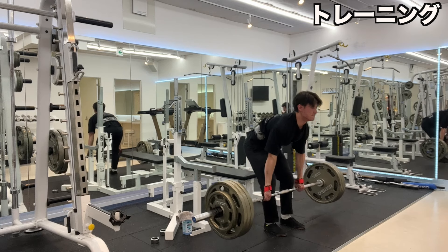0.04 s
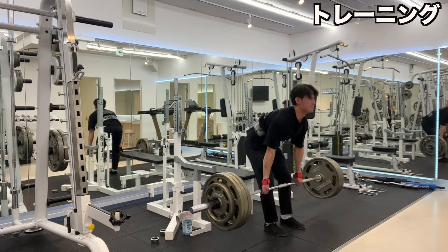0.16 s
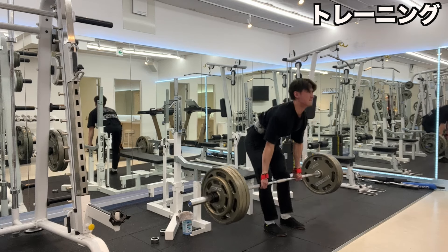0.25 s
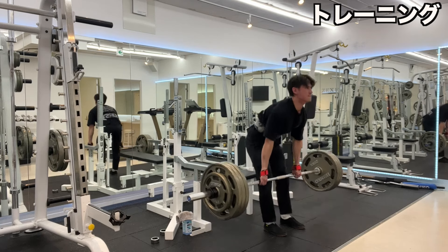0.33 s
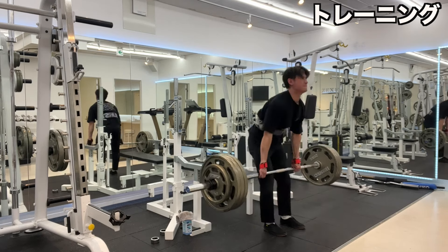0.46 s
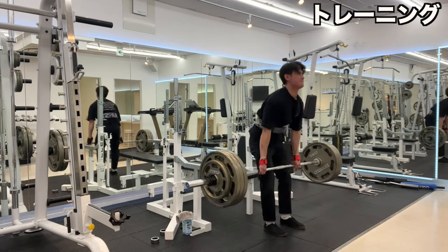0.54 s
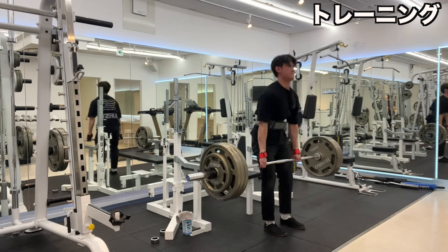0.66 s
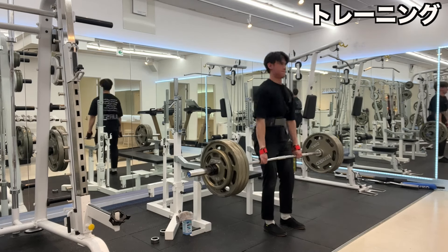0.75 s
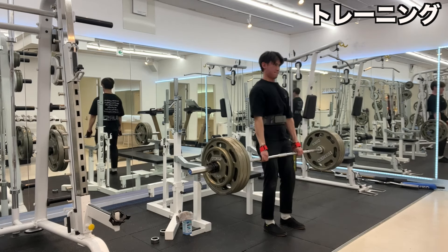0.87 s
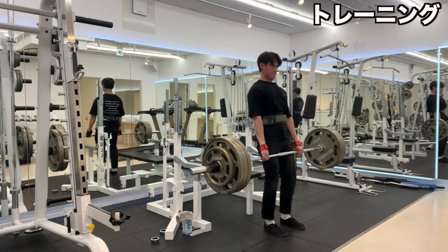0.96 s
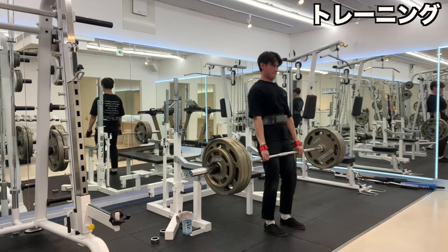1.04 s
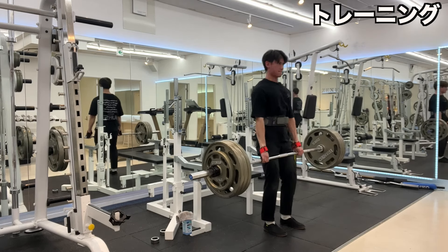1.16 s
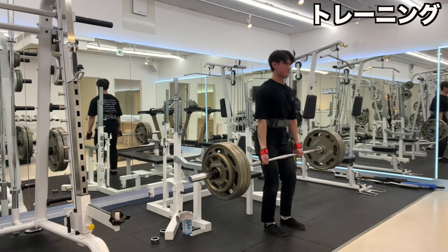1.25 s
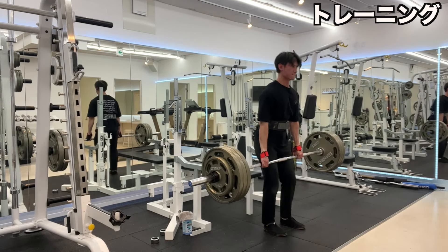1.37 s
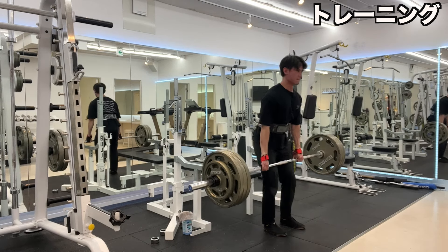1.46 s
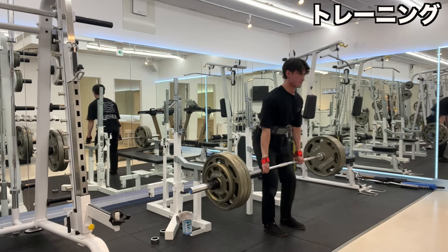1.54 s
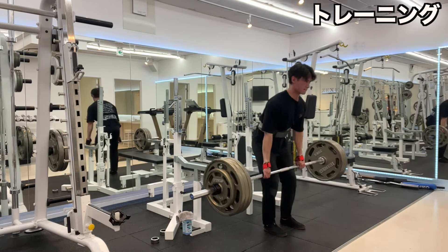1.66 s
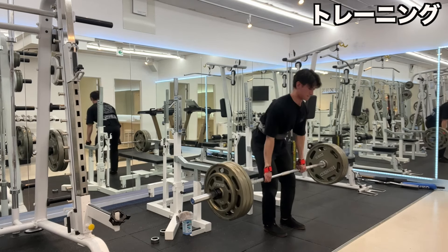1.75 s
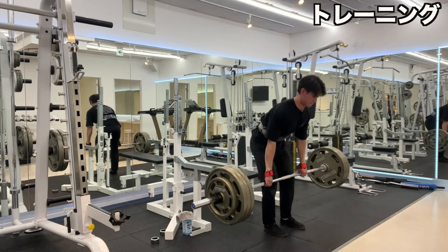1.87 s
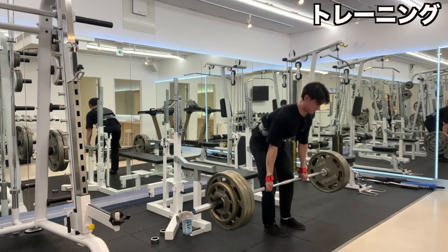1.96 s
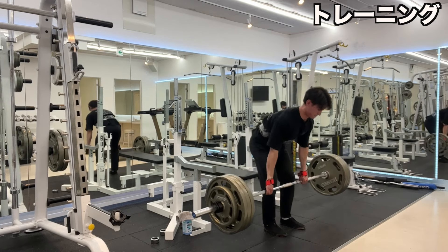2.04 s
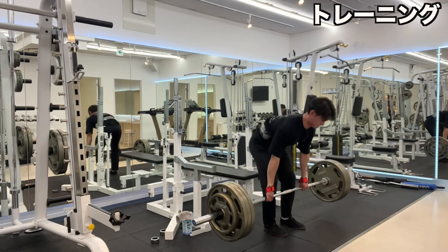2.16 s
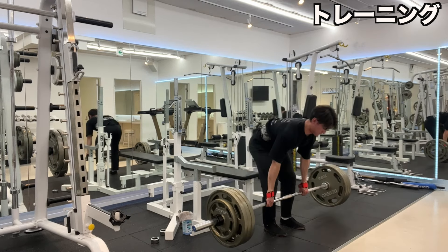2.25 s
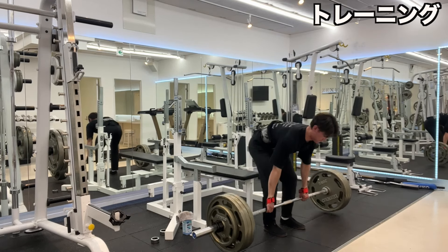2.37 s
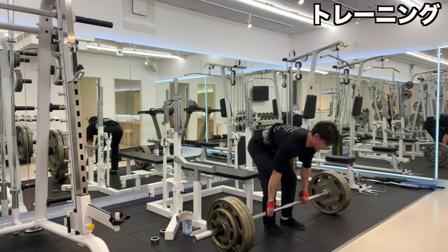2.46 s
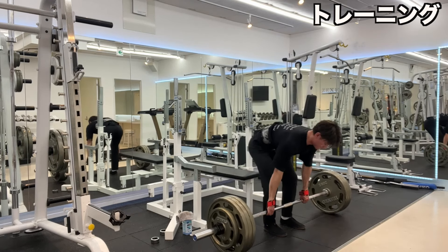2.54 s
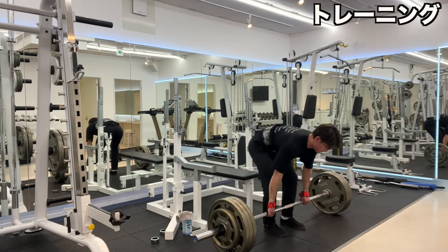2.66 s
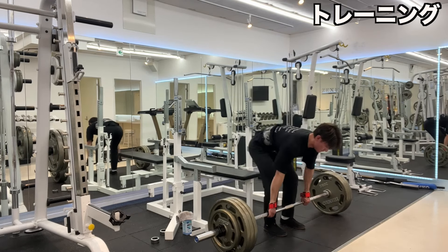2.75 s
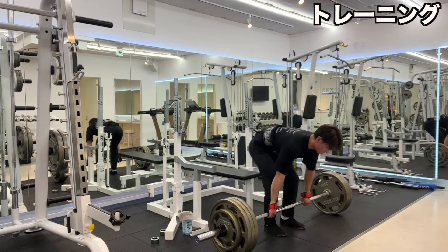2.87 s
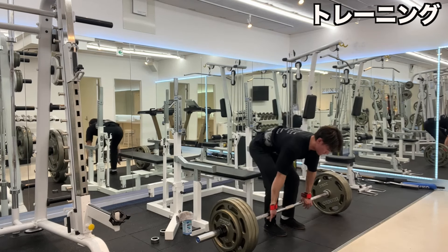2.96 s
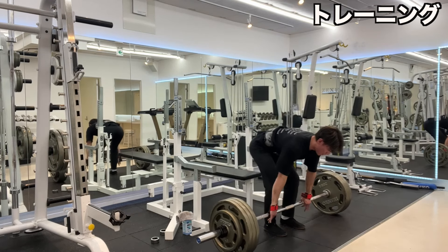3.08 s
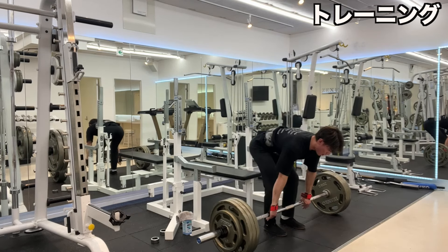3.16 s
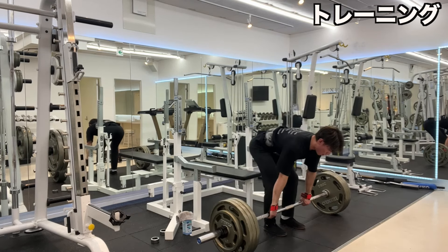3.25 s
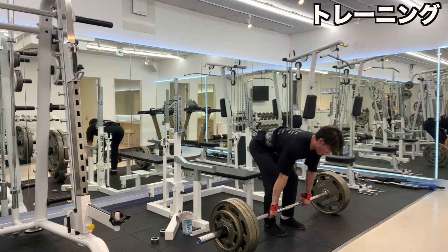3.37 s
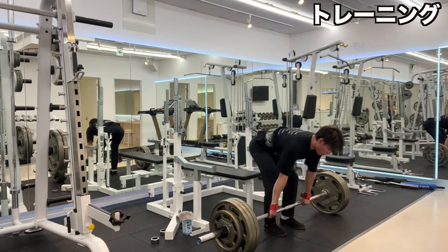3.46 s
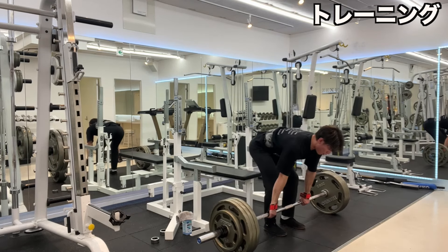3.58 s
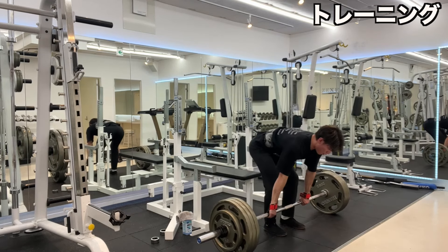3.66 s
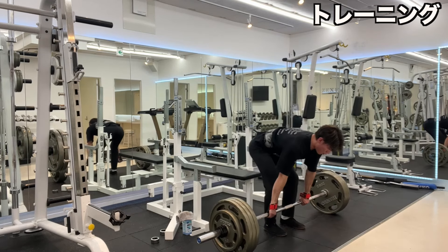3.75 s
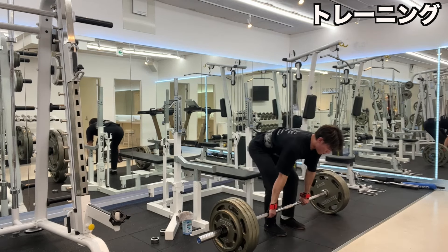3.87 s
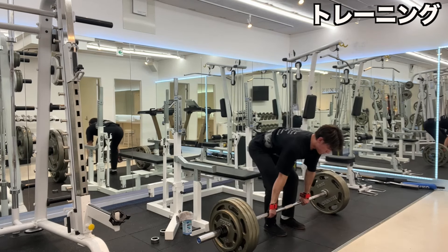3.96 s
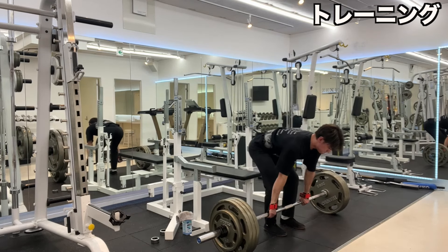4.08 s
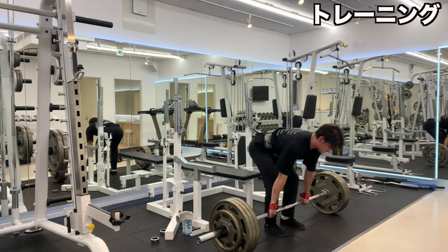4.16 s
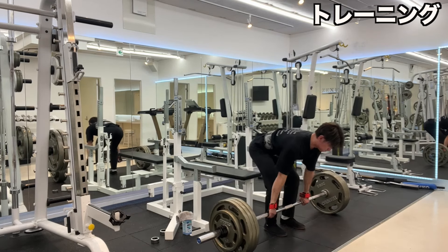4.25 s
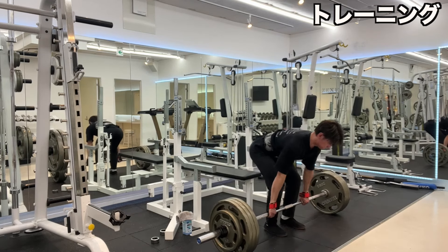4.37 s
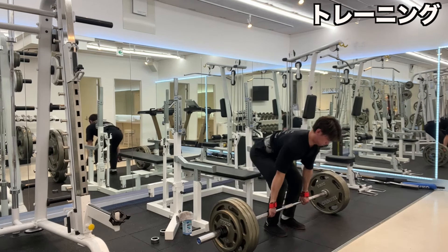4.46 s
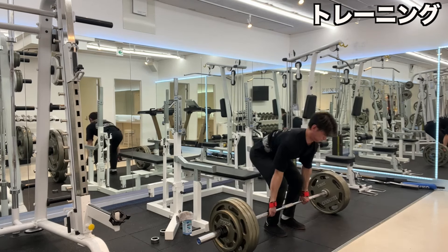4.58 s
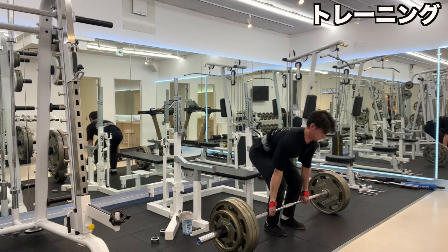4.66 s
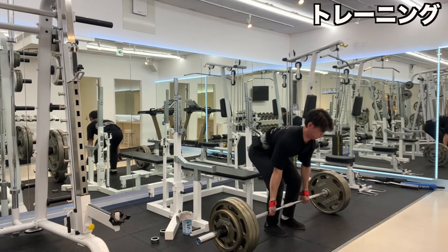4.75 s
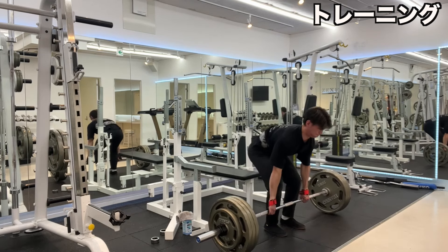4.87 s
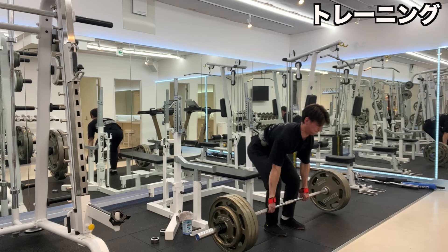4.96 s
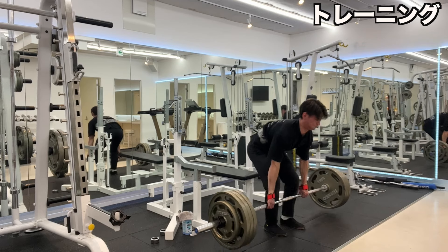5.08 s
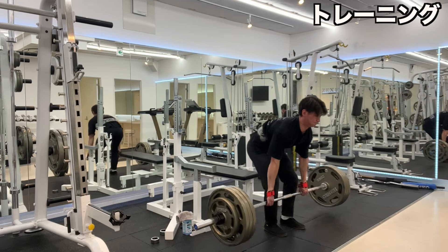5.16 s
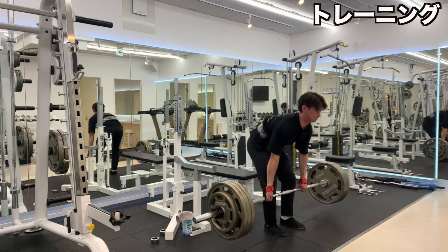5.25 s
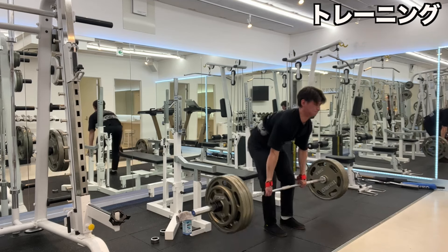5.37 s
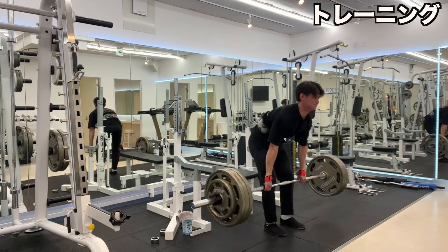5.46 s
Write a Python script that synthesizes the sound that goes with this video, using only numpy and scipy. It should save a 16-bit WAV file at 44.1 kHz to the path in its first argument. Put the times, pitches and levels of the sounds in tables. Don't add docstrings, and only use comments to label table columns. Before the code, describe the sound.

Loose iron plates clank and ring on a barbell during a lift, then go almost quiet. The bar slams onto a rubber floor with a loud metallic crash, rattle and deep thud, bounces and rocks to rest. After a pause it clanks upward again, with shoe scuffs. Low ventilation hum; close stereo microphone in a moderately reverberant gym.

```python
import sys
import numpy as np
from scipy import signal
from scipy.fft import rfft, irfft, next_fast_len
from scipy.io import wavfile
from scipy.ndimage import map_coordinates

SR = 44100
rng = np.random.default_rng(int(sys.argv[2]) if len(sys.argv) > 2 else 0)


def gain_from_db(level_db):
    decades = np.asarray(level_db, float) / 20
    return 10 ** decades


def inscribe(sig):
    pcm = np.round(np.clip(np.atleast_2d(sig).T, -1, 1) * 32767)
    wavfile.write(sys.argv[1], SR, pcm.astype(np.int16))


N = 243431


def unit(x):
    return x / np.sqrt(np.mean(x ** 2) + 1e-20)


def along(points, hz):
    f, v = np.transpose(points)
    return np.interp(np.log(hz + 1), np.log(f + 1), v)


def wobble(rate_hz):
    knots = rng.standard_normal(int(N * rate_hz / SR) + 4)
    return map_coordinates(knots, [np.arange(N) * rate_hz / SR])


def filtered(x, response):
    m = next_fast_len(N + SR // 2)
    return irfft(rfft(x, m) * response(np.fft.rfftfreq(m, 1 / SR)), m)[..., :N]


def noise(spectrum):
    return unit(filtered(rng.standard_normal(N), lambda hz: gain_from_db(along(spectrum, hz))))


def resonance(hz, centre_hz, width_hz):
    loss = 1j * hz * width_hz
    return loss / (centre_hz ** 2 - hz ** 2 + loss)


# pitch_hz, level_db
AIR = [(12, -34), (20, -6.5), (120, -10.5), (195, -13), (336, -10.5), (441, -19.5), (779, -19.5),
       (1300, -27.5), (1860, -34), (2570, -40), (13100, -58.5)]
# pitch_hz, correlation
AIR_ALIKE = [(60, 0.76), (170, 0.52), (1490, -0.53), (9000, 0.31), (13000, -0.3)]
# pitch_hz, level_db, width_hz
MOTOR = [(106, -59, 4), (202, -69, 3.7)]


def ventilation():
    def turn(hz):
        return np.arccos(np.clip(along(AIR_ALIKE, hz), -1, 1)) / 2

    pair = np.array([noise(AIR), noise(AIR)])
    mid, side = filtered(pair, lambda hz: [np.cos(turn(hz)), np.sin(turn(hz))])
    duct = gain_from_db(-61.5 + 5.0 + 0.7 * wobble(3.0)) * np.array([mid + side, mid - side])
    hum = np.zeros(N)
    for hz, db, width_hz in MOTOR:
        level = np.sqrt(2) * gain_from_db(db + 0.51 * wobble(8.2))
        hum += level * np.sin(2 * np.pi * np.cumsum(hz + width_hz * wobble(17)) / SR)
    return duct + hum * gain_from_db([[0.8], [-0.8]])


FAMILY_EDGES = [825, 1450, 2250, 3300]
# pitch_hz, t60_s
RING = [(500, 0.3), (1000, 0.14), (1700, 0.23), (2800, 0.28), (4200, 0.51)]
# pitch_hz, level_db
KNOCK = [(110, -47.5), (210, -21.5), (511, -9.5), (624, -5.5), (862, -9.5), (1010, -2), (1520, -18.5),
         (1960, -14.5), (2170, -23.5), (2930, -28.5), (3200, -48), (11000, -120)]


def plates(contacts, modes, scatter_db, knock_db, high_db, top_db, rub, choke_s, main_db):
    hz, level_db = np.transpose(modes)
    family = np.searchsorted(FAMILY_EDGES, hz)
    knots, t = np.arange(36) / 100, np.arange(SR * 35 // 100) / SR
    between = np.maximum(1 - 100 * np.abs(t - knots[:, None]), 0)
    rise = (1 - np.exp(-t / 0.0017)) ** 2 * (0.66 + 0.4 * np.exp(-t / 0.011))
    chance = rng.standard_normal((len(contacts), len(hz), 2 + 2 * len(knots)))
    follow = np.append(np.transpose(contacts)[0][1:], 99)
    strongest_db = np.max(contacts, axis=0)[1]
    out, knocks = np.zeros(N + SR), np.zeros((3, N + SR))
    for (s, db, flat_db, edge_db), later, draw in zip(contacts, follow, chance):
        hard = 0.58 * (db - strongest_db)
        high = high_db + edge_db + hard
        top = top_db + 0.78 * edge_db + hard
        damp = gain_from_db(-60 * np.maximum(t - (later - s), 0) / choke_s) * np.cos(np.pi / 2 * (t / t[-1]) ** 2)
        drift = np.cumsum(rub * draw[:, 2::2], axis=1) @ between
        swell = gain_from_db(2.28 * rub * draw[:, 3::2] - 60 * knots / along(RING, hz)[:, None])
        swell[family > 2] *= 1 - np.exp(-knots / (0.002 * np.abs(hard) + 1 / SR))
        swell = swell @ between
        turn = 2 * np.pi * (hz * (1 + 0.0058 * draw[:, 1]))[:, None] * t + drift
        share = gain_from_db(level_db + scatter_db * draw[:, 0])
        share /= np.sqrt(np.bincount(family, share ** 2))[family]
        family_db = np.array([flat_db, main_db, edge_db + main_db, high, top])
        gain = share * gain_from_db(db + 2.5 + family_db[family])
        start = max(round((s - 0.002) * SR), 0)
        out[start:][:len(t)] += rise * damp * (gain @ (swell * np.sin(np.float32(turn))))
        band_db = np.array([[flat_db + 8], [0], [edge_db + 3]])
        knocks[:, start:][:, :len(t)] += gain_from_db(db + knock_db + band_db - 60 * t / 0.16) * rise * damp
    body = filtered(noise(KNOCK), lambda f: np.searchsorted(FAMILY_EDGES[:2], f) == [[0], [1], [2]])
    return out[:N] + np.sum(knocks[:, :N] * body, axis=0)


# (rim blows, 1.7 kHz family and up)
CARRIED = [(0.003, -32.5, -8.5, 2.5), (0.08, -27.5, -11, -4), (0.139, -34.5, -4, 3.5), (0.179, -52, 3, 8.5),
           (0.279, -42, -2.5, -14), (0.344, -45.5, -14, -6.5), (0.558, -35, -13, -15),
           (0.612, -36, -11, -1), (0.644, -25, -11, -1.5), (0.69, -33, -4, 12), (0.703, -44, -17.5, -9),
           (0.759, -32, -25, -13.5), (0.889, -41.5, -10.5, -13), (0.968, -51.5, -3, 0.5),
           (1.283, -42.5, -6, -4.5), (1.404, -47, -1.5, -11), (1.55, -68, -14, -11), (1.871, -40, -8, -2.5),
           (1.921, -43, -9, -3), (1.967, -31.5, -12, 0.5), (1.997, -39.5, -10, 9), (2.039, -43.5, -12, 9.5),
           (2.14, -46.5, -12, -14), (5.163, -32, -9.5, -3.5), (5.252, -34, -12.5, 2.5),
           (5.27, -35, -10.5, 2), (5.296, -32.5, -4.5, 5.5), (5.361, -27.5, -14, -1.5),
           (5.385, -45.5, -5, 2), (5.444, -54, -16.5, 0)]
# pitch_hz, level_db
HANGING = [(602.9, -64), (662.1, -64.5), (974.4, -49), (1114, -56), (1152, -59.5), (1233, -66.5),
           (1389, -100.5), (1674, -42), (1717, -42.5), (1820, -65.5), (1884, -82.5), (2466, -65.5),
           (2503, -78.5), (2692, -77), (2724, -60), (2864, -78.5), (3052, -78.5), (3445, -91.5),
           (3521, -99), (3601, -83.5), (3871, -87.5), (4113, -104)]


def carried_plates():
    return plates(CARRIED, HANGING, scatter_db=4.5, knock_db=-4, high_db=-11.5, top_db=-27.0,
                  rub=1.0, choke_s=0.36, main_db=1)


# start_s, pitch_hz, level_db, length_s
CRASH = [(2.416, 946, -11.5, 0.036), (2.416, 1004, -5.5, 0.022), (2.416, 1622, -21.5, 0.084),
         (2.419, 1130, -17.5, 0.043), (2.421, 1046, -13.5, 0.045), (2.421, 1211, -23, 0.084),
         (2.421, 1683, -17, 0.092), (2.424, 1081, -15, 0.02), (2.428, 1892, -19, 0.043),
         (2.428, 2022, -21.5, 0.04), (2.433, 988, -14, 0.035), (2.433, 1167, -23, 0.064),
         (2.438, 2099.0, -21, 0.064), (2.443, 1763, -23, 0.11), (2.456, 2083, -25.5, 0.075),
         (2.468, 2690, -22, 0.042), (2.486, 1064, -23.5, 0.096), (2.503, 1035, -25, 0.068),
         (2.508, 1673, -24, 0.083), (2.508, 1862, -25, 0.059), (2.561, 2053, -28.5, 0.143),
         (2.563, 1745, -25.5, 0.13), (2.563, 2657, -26.5, 0.027), (2.571, 1690, -20.5, 0.037),
         (2.583, 1813, -20.5, 0.028), (2.586, 994, -29, 0.047), (2.588, 951.5, -18.5, 0.032),
         (2.593, 1870, -28, 0.1), (2.596, 3950, -29.5, 0.041), (2.598, 1192, -21.5, 0.11),
         (2.601, 1260, -21, 0.038), (2.601, 1670, -28, 0.215), (2.601, 1943, -27.5, 0.15),
         (2.603, 1035, -20.5, 0.11), (2.606, 1147, -23.5, 0.028), (2.611, 1725, -23.5, 0.098),
         (2.638, 1241, -22, 0.039), (2.643, 1996, -26, 0.056), (2.648, 1860, -24, 0.039),
         (2.668, 978.5, -22, 0.091), (2.675, 1697, -28.5, 0.13), (2.703, 1139, -21.5, 0.047),
         (2.703, 1828, -24.5, 0.16), (2.71, 2944, -30.5, 0.035), (2.713, 1023.0, -29.5, 0.081),
         (2.738, 1071, -20.5, 0.044), (2.75, 1760.0, -38.5, 0.32), (2.77, 1030, -33.5, 0.2)]
# start_s, pitch_hz, level_db, length_s
ROCKING = [(2.823, 1761, -39, 0.29), (2.845, 1930, -37.5, 0.24), (2.922, 1161, -29, 0.075),
           (2.95, 4100, -51, 0.038), (2.982, 1066.0, -25.5, 0.078), (3.032, 1633, -31.5, 0.048),
           (3.032, 4720, -54, 0.038), (3.032, 6230, -56, 0.034), (3.036, 1722, -27.5, 0.054),
           (3.037, 537, -33.5, 0.15), (3.037, 1006, -35.5, 0.12), (3.04, 4100, -49.5, 0.042),
           (3.111, 987, -37, 0.075), (3.187, 600, -30, 0.062), (3.202, 1647, -37, 0.051),
           (3.204, 1007.0, -36.5, 0.037), (3.204, 1144, -34.5, 0.05), (3.208, 1693, -40.5, 0.11),
           (3.232, 1764, -37, 0.12), (3.267, 564.4, -36.5, 0.07), (3.271, 1003, -34.5, 0.1),
           (3.275, 4005, -56.5, 0.06), (3.646, 1594, -37, 0.079), (3.653, 1155, -32.5, 0.055),
           (3.654, 1674.0, -33, 0.075), (3.667, 980.0, -28, 0.051), (3.667, 1713, -39, 0.13),
           (3.686, 521.3, -33, 0.14), (3.805, 970, -40.5, 0.13)]
# start_s, pitch_hz, level_db, length_s
RAISED = [(0.15, 2722, -50, 0.097), (0.355, 2580, -60, 0.049), (4.396, 1017, -31, 0.098),
          (4.411, 1145, -26.5, 0.046), (4.417, 528.5, -36, 0.063), (4.426, 1059, -34, 0.092),
          (4.545, 529.7, -26, 0.041), (4.544, 968, -29.5, 0.051), (4.7, 991, -41, 0.15),
          (4.747, 1700, -41.4, 0.11), (4.806, 1196, -32, 0.029), (4.813, 1770, -40, 0.084),
          (4.814, 1943, -40.5, 0.042), (4.816, 1049, -38, 0.14), (4.817, 1116, -32.5, 0.069),
          (4.822, 988, -43, 0.158), (4.967, 1650, -27, 0.028), (4.969, 1713, -28.5, 0.043),
          (4.97, 1133, -20, 0.038), (4.97, 1764, -32.5, 0.15), (4.97, 1777, -35, 0.0576),
          (4.973, 1950, -30, 0.068), (4.975, 2916, -35.5, 0.18), (4.978, 1067, -27, 0.076),
          (5.043, 1036, -31.5, 0.13), (5.044, 1817, -18, 0.024), (5.137, 1820, -37.5, 0.097),
          (5.145, 962, -36, 0.11), (5.147, 1100, -38.5, 0.036), (5.157, 1630, -32, 0.051),
          (5.23, 1633, -41.5, 0.036), (5.26, 1028, -30, 0.032), (5.272, 1705, -40.5, 0.075),
          (5.299, 1158, -32, 0.036), (5.308, 1628, -39, 0.043), (5.349, 1657, -35, 0.11),
          (5.354, 1043, -31, 0.05), (5.379, 1758, -29.5, 0.04), (5.432, 1746, -37, 0.094)]


def held_rings():
    close_db, open_s = -14.5, 0.0017
    out, t = np.zeros(N + SR), np.arange(SR // 2) / SR
    rows = CRASH + ROCKING + RAISED
    for (s, hz, db, length_s), turn in zip(rows, rng.random(len(rows))):
        envelope = gain_from_db(db + close_db * (t / length_s) ** 2) * (1 - np.exp(-(t / open_s) ** 2))
        out[round(s * SR):][:len(t)] += envelope * np.sin(2 * np.pi * (hz * t + turn))
    return out[:N] * gain_from_db(1.6 * wobble(70))


# start_s, level_db, t60_s, brightness_db (above 8 kHz)
SCUFFS = [
    (0.2494, -64.5, 0.36, -0.5),
    (0.53, -65, 1.3, 3.5),
    (0.64, -66, 1.4, 0),
    (2.2776, -54, 0.27, 10),
    (4.643, -56.5, 0.53, 1),
    (4.867, -46, 0.54, -0.5),
    (4.95, -46.5, 0.24, -0.5),
]
# pitch_hz, level_db
SOLE = [(1500, -20), (3300, 1), (4500, -1), (5290, -5), (7350, -13), (10600, -10.5), (15500, -7.5)]
# pitch_hz, level_db
SQUEAK = [(4300, 11), (6670, 6), (8440, 5)]
# middle_s, half_length_s, pitch_hz, glide_hz_per_s, level_db
CREAK = (2.256, .035, 1490, -4000, -57)


def soles():
    t = np.arange(N) / SR
    hiss = gain_from_db(1.3 * wobble(53)) * noise(SOLE)
    top = filtered(hiss, lambda f: 1 / (1 + (8000 / (f + 1)) ** 6))
    out = np.zeros(N)
    for s, db, t60, bright_db in SCUFFS:
        rise = 1 - np.exp(-np.maximum(t - s, 0) / (0.025 * t60 ** 2))
        fall = gain_from_db(db - 1.5 - 60 * np.abs(t - s) / t60)
        out += rise * fall * (hiss + (gain_from_db(bright_db) - 1) * top)
    width_hz, hold_s = 370, 0.064
    squeak = filtered(hiss, lambda f: sum(gain_from_db(db) * resonance(f, c, width_hz) for c, db in SQUEAK))
    s, db = SCUFFS[4][:2]
    out += (t > s) * gain_from_db(db - 10 * ((t - s) / hold_s - 0.5) ** 2) * squeak
    s, half_s, hz, glide, db = CREAK
    creak = np.sin(2 * np.pi * (hz + glide * (t - s) / 2) * (t - s))
    return out + gain_from_db(db - 10 * ((t - s) / half_s) ** 2) * creak


def dying_tones(rows):
    out, t = np.zeros(N + SR), np.arange(SR // 2) / SR
    for s, hz, db, t60 in rows:
        envelope = gain_from_db(db - 60 * t / t60) * (1 - np.exp(-t / 0.0021))
        out[round(s * SR):][:len(t)] += envelope * np.sin(2 * np.pi * hz * t)
    return out[:N] * gain_from_db(3.4 * wobble(40))


# start_s, pitch_hz, level_db, t60_s
SINGLES = [(0.56, 1683, -39, 0.43), (.68, 3610, -49, 0.23), (1.22, 972, -54.5, 0.39),
           (1.283, 1718, -44.5, 0.22), (1.402, 1097, -40, 0.13), (1.45, 1069, -50, 0.38),
           (1.987, 1680, -41, 0.19), (2.035, 1726, -34.5, 0.15), (2.42, 580.7, -25, 0.4),
           (2.61, 569.6, -23, 0.5), (2.751, 3783, -38.5, 0.92), (2.86, 397.2, -36.5, 0.48),
           (3.68, 576, -33.5, 0.38), (4.263, 1687, -44, 0.36), (4.821, 3054, -53.5, 0.7),
           (4.99, 4293, -40, 0.36), (5.001, 1946, -40, 0.94), (5.045, 1837, -22, 0.71),
           (5.269, 1098, -19.5, 0.037), (5.3, 2520, -47.5, 0.58), (5.36, 1063, -17, 0.037)]


def single_plates():
    return dying_tones(SINGLES)


# start_s, strength_db, flatness_db, edge_db
LANDED = [(2.387, -29.5, -16, -2), (2.41, -14.5, -17.5, -5.5), (2.416, -5, -15.5, -4),
          (2.444, -15.5, -32.5, 4.5), (2.464, -20, -10.5, 0), (2.489, -30, -8, 2.5), (2.511, -30, -13, 0),
          (2.589, -13.5, -19, -1.5), (2.604, -16, -9.5, 2), (2.641, -16, -11, -2.5), (2.679, -18, -29, 1),
          (2.715, -20.5, -11, 1.5), (2.747, -19, -16, -14), (2.815, -34.5, -8.5, 5.5)]
# pitch_hz, level_db
STRUCK = [(581.4, -40), (990.5, -32), (1034, -30), (1163, -34), (1206, -46.5), (1405, -52), (1626, -36),
          (1658, -40.5), (1712, -36), (1766, -37), (1809, -40), (1927, -38), (1986, -41), (2089, -33),
          (2159, -42.5), (2299, -54.5), (2632, -50), (2724, -43), (2853, -52), (3208, -56), (3257, -49.5),
          (3488, -45.5), (3639, -50.5), (4102, -53.5), (4301, -54), (4360, -52.5), (4468, -60.5),
          (4506, -56)]


def landed_plates():
    return plates(LANDED, STRUCK, scatter_db=2.5, knock_db=0.5, high_db=-22.0, top_db=-16.5,
                  rub=1.0, choke_s=0.12, main_db=-2.5)


# start_s, rattle_db, thud_db
BOUNCES = [
    (2.407, -15.5, -20.5),
    (2.582, -22, -39),
    (2.68, -32, -38.5),
]


def bursts(levels_db, rise_s, t60_s, tail_db, tail_t60_s, lead_s):
    since = np.maximum(np.arange(N) / SR + lead_s - np.transpose(BOUNCES)[0][:, None], 0)
    fall = gain_from_db(-60 * since / t60_s) + gain_from_db(tail_db - 60 * since / tail_t60_s)
    rise = (1 - np.exp(-(since / (rise_s + lead_s)) ** 2)) ** (1 + lead_s / 0.0061)
    return gain_from_db(levels_db) @ (rise * fall)


# pitch_hz, level_db
CLATTER = [(1290, -38.5), (2200, -10.5), (2770, -5), (4340, -3), (4710, -6.5), (7590, -18), (12600, -23.5),
           (15700, -36)]
# pitch_hz, level_db
SLEEVE = [(2724, -53), (2853, -52.5), (3381, -49.5), (3634, -48), (3962, -58), (4469, -52), (5125, -49),
          (6220, -56), (6670, -62), (7210, -59)]


def landing_rattle():
    rattle = bursts(np.transpose(BOUNCES)[1], rise_s=0.0092, t60_s=0.26, tail_db=-25.5,
                    tail_t60_s=1.134, lead_s=0.014)
    taps = (rng.random(N) < 900 / SR) * gain_from_db(5.5 * rng.standard_normal(N))
    grit = unit(signal.lfilter([1], [1, -0.985], taps))
    fizz = unit((3.3 + grit) * noise(CLATTER))
    bright = filtered(fizz, lambda f: 1 / (1 + (5500 / (f + 1)) ** 4))
    fizz = fizz - bright * (1 - (rattle / rattle.max()) ** 0.51)

    def modes(f):
        return sum((-1) ** k * gain_from_db(db) * resonance(f, c, 14) for k, (c, db) in enumerate(SLEEVE))

    steel = unit(filtered(taps * rng.standard_normal(N), modes))
    return rattle * (gain_from_db(11.5) * fizz + gain_from_db(3.0) * steel)


# pitch_hz, level_db
THUD = [(20, -10.5), (40, -3), (50, -16), (70, 2.5), (100, -4), (160, -1.5), (300, -11), (600, -47)]


def floor_thud():
    thud = bursts(np.transpose(BOUNCES)[2], rise_s=0.0062, t60_s=0.18, tail_db=-18,
                  tail_t60_s=1.4, lead_s=0)
    return thud * gain_from_db(-2.5 + 1.3 * wobble(30)) * noise(THUD)


# pitch_hz, level_db, t60_s
SLAB = [(31.8, -35, .9), (62, -40, 0.8), (79.6, -33, 0.67), (157, -21.5, 0.14), (221.6, -20.5, 0.16)]


def slab_ring():
    rows = []
    for k, bounce in enumerate(BOUNCES[:2]):
        rows += [(bounce[0], hz, db - 10 * k, t60) for hz, db, t60 in SLAB]
    return dying_tones(rows)


# start_s, strength_db, flatness_db, edge_db
SETTLING = [(2.869, -35, -2.5, -6), (2.92, -22, -10.5, -1), (2.98, -25.5, -33.5, -0.5),
            (3.033, -25.5, -11, 5), (3.059, -27, -12, -1.5), (3.104, -29, -10, -8),
            (3.169, -24.5, -9.5, -6.5), (3.203, -24.5, -9.5, -1), (3.235, -36.5, 0, 8),
            (3.27, -22.5, -9.5, -3), (3.298, -49, -3.5, -3), (3.359, -65, 6.5, -14), (3.64, -30.5, -1, -2),
            (3.665, -26.5, -14.5, 2.5), (3.688, -31.5, -5, -3.5), (3.756, -60, -2, 4),
            (3.871, -47.5, -14.5, -20), (4.077, -59.5, 11, -17)]
# pitch_hz, level_db
RESTING = [(398.4, -57), (538.3, -51.5), (576.0, -48), (737.5, -66), (850.6, -61), (893.6, -60),
           (1007, -46), (1066, -49), (1141, -47.5), (1244, -59.5), (1421, -105.5), (1669, -38),
           (1712, -43.5), (1787, -46.5), (1814, -40), (1927, -46), (1986, -55), (2035, -51), (2099, -66.5),
           (2449, -81.5), (2649, -71.5), (2810, -72), (2885, -78.5), (3025, -88), (3472, -85),
           (3618, -72.5), (4107, -77.5), (4517, -85.5)]


def settling_plates():
    return plates(SETTLING, RESTING, scatter_db=4.5, knock_db=-7.5, high_db=-17.5, top_db=-38,
                  rub=0.98, choke_s=0.053, main_db=-3)


# start_s, strength_db, flatness_db, edge_db
LIFTED = [(4.264, -37.5, -11, -8.5), (4.326, -52.5, 10, -18.5), (4.383, -27, -6.5, -5.5),
          (4.415, -29, -4, -2.5), (4.452, -32, -8.5, -4), (4.502, -43, -8, 2), (4.534, -33.5, -0.5, -10),
          (4.548, -26, -11.5, -8.5), (4.592, -44.5, -14, -1), (4.642, -44, -9.5, -2),
          (4.714, -37, 0.5, -6.5), (4.74, -26.5, -15, -6.5), (4.809, -28, -8, -1), (4.868, -28.5, -28, -15),
          (4.912, -23.5, -17, -8.5), (4.953, -24.5, -16.5, -5), (4.972, -19, -12, 5.5),
          (5.0, -28.5, -8, -10), (5.045, -35.5, -8, -8.5), (5.112, -26, -10, -5.5), (5.165, -46, -3.5, -5)]
# pitch_hz, level_db
RISING = [(393.0, -62.5), (527.6, -63), (635.2, -52), (710.6, -58), (742.9, -66.5), (807.5, -81),
          (888.2, -68.5), (974.4, -49), (1061, -45), (1136, -57.5), (1157, -47), (1453, -82.5),
          (1507, -66.5), (1766, -47.5), (1809, -53), (1836, -48.5), (1922, -44.5), (2105, -58),
          (2239, -74.5), (2519, -79.5), (2665, -76), (2767, -62), (2885, -72), (3020, -62), (3354, -77.5),
          (3790, -71), (4091, -73.5), (4296, -81.5)]


def lifted_plates():
    return plates(LIFTED, RISING, scatter_db=3.5, knock_db=-2.5, high_db=-13.0, top_db=-29,
                  rub=0.81, choke_s=0.054, main_db=-3.5)


# pitch_hz, t60_s
HALL = [(150, 0.54), (1000, 0.45), (4000, 0.48), (8000, 0.21), (12000, 0.4)]


def hall(x):
    hz, t, z = signal.stft(rng.standard_normal((2, SR * 3 // 4)), SR, nperseg=256)
    tail = signal.istft(z * gain_from_db(-60 * t / along(HALL, hz)[:, None]), SR, nperseg=256)[1]
    delayed = np.pad(x, (220, 0))[None]
    return signal.fftconvolve(delayed, tail / np.linalg.norm(tail[0]), axes=1)[:, :N]


# pitch_hz, lead_rad
LEAD = [(150, 0), (520, -.6), (1900, -1), (2400, -2.2), (3620, -2.2), (5510, -1.8), (8300, -1),
        (9000, -.05), (11300, .1), (13400, np.pi), (16000, np.pi)]
# pitch_hz, level_db
WET = [(150, -14.5), (400, -4.5), (1000, -3.5), (2500, -5), (5000, -13.5), (8000, -5.5), (12000, -17.5)]


def scene():
    air = ventilation()
    near = carried_plates() + soles() + single_plates()
    near += landed_plates() + landing_rattle() + slab_ring()
    near += settling_plates() + lifted_plates()
    rings = held_rings()
    direct = near + gain_from_db(2) * rings
    ports = filtered(direct, lambda hz: np.exp(0.5j * along(LEAD, hz) * [[1], [-1]]))
    room = filtered(hall(near + gain_from_db(-3.5) * rings), lambda hz: gain_from_db(along(WET, hz)))
    return gain_from_db(-4.5) * ports * gain_from_db([[-0.3], [0.3]]) + room + floor_thud() + air


# low_hz, high_hz
PORT_GAPS = [(13300, 16000), (8900, 11300)]


def top_cut(x):
    return signal.sosfilt(signal.butter(12, 15750, fs=SR, output="sos"), x)


def record(dry):
    held = dry / (1 + np.abs(dry / 0.93) ** 4) ** 0.25
    pair = np.array([held[0] + held[1], held[0] - held[1]]) / 2
    mid, side = filtered(pair, lambda hz: [gain_from_db(-30 * ((hz > lo) & (hz < hi))) for lo, hi in PORT_GAPS])
    return top_cut(np.array([mid + side, mid - side]))


dry = scene()
out = record(dry)
inscribe(out)
```